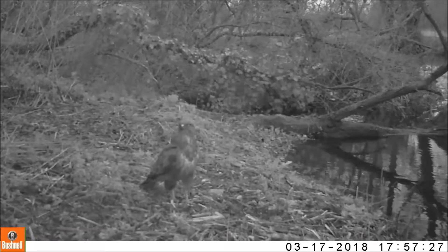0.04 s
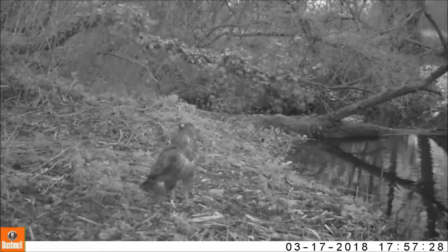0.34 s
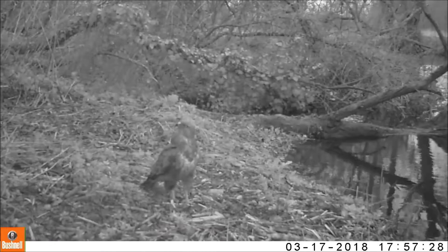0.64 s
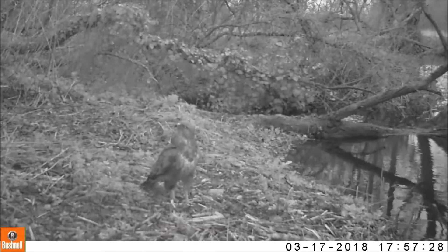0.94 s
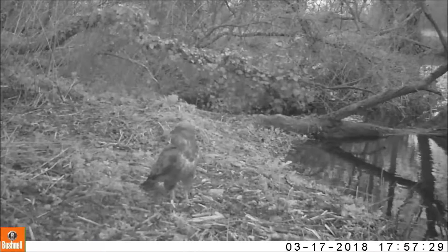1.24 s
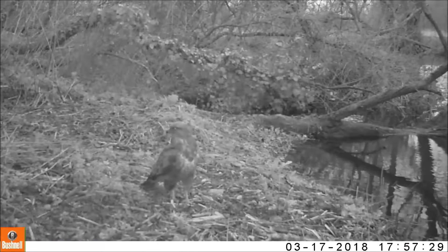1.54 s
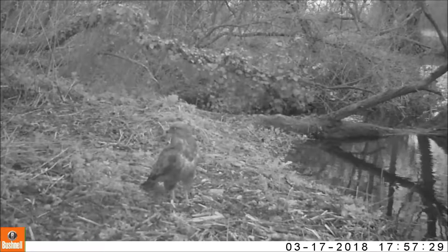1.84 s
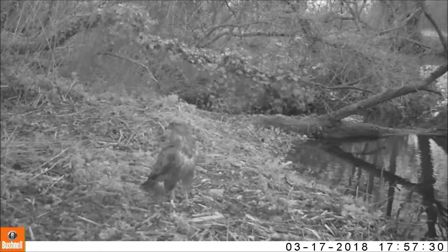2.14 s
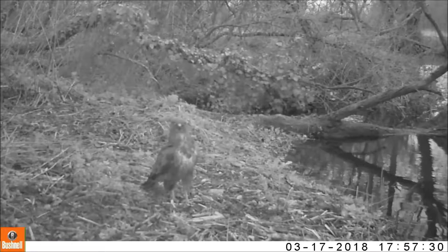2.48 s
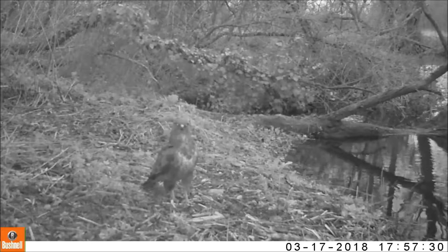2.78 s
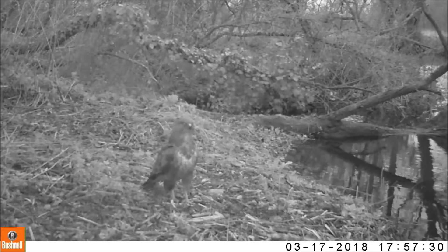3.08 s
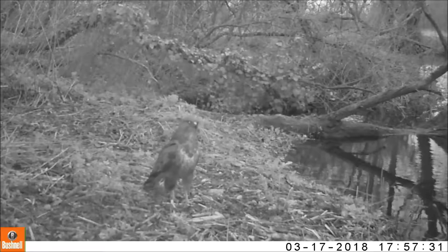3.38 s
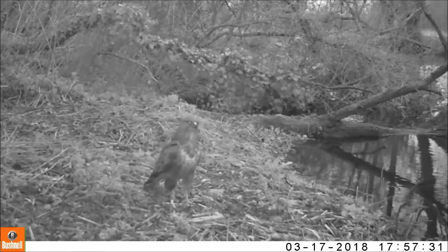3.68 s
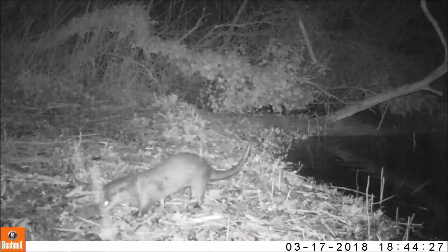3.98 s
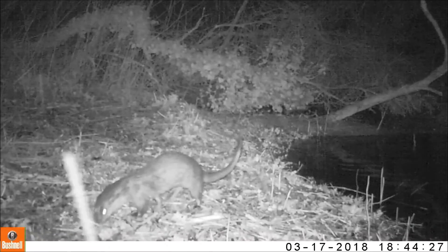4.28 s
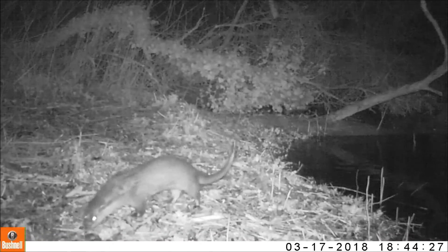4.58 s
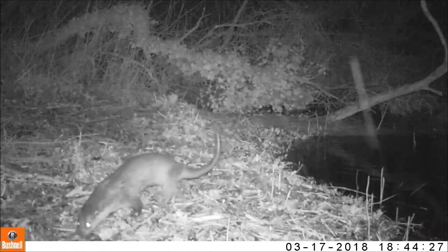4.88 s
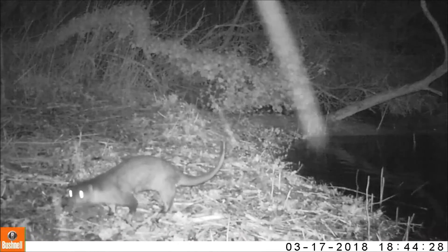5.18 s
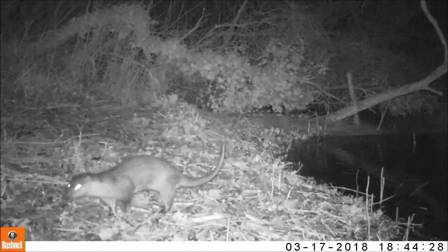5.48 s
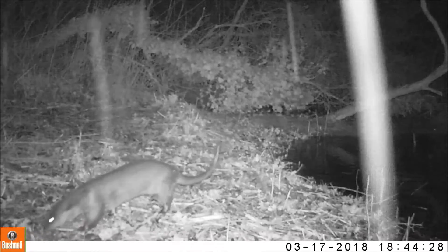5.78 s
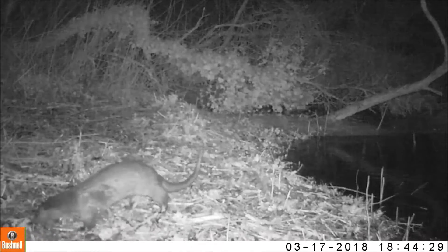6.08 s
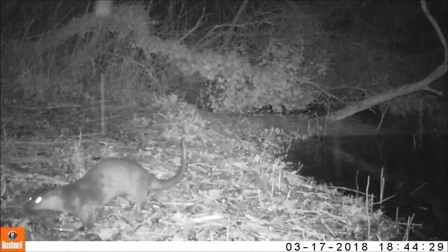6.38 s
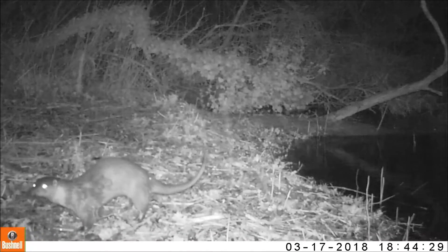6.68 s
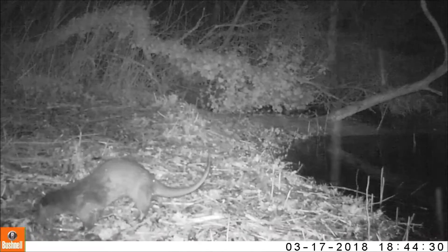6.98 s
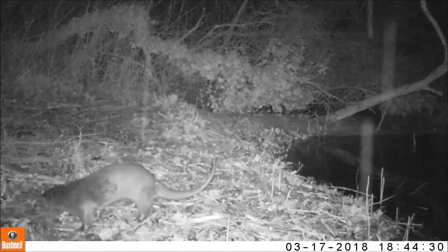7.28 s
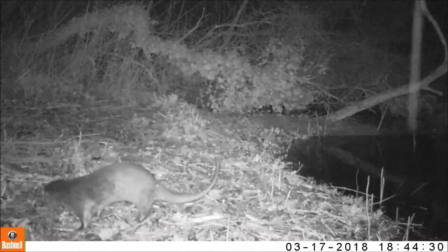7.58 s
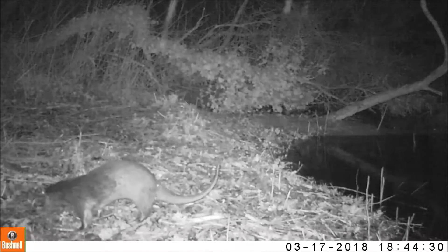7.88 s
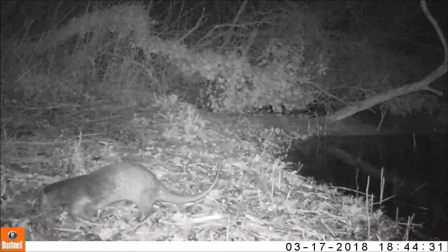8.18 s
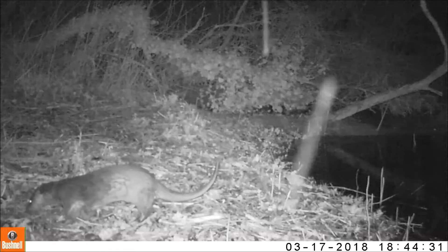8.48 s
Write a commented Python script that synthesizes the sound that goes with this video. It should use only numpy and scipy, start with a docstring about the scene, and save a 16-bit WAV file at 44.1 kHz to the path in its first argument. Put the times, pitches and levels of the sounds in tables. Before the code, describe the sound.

Four short, high whistled chirps from a small bird sound outdoors, with a light breeze on the microphone and steady hiss.

```python
"""Low rumble and even microphone hiss, with a breeze nudging the microphone in soft gusts.
A small bird on a wooded river bank gives four thin, falling whistles: near-pure tones,
scattered by bushes and the far bank. Dry leaves rub faintly.
After the last whistle the sound cuts, with a click, to still air; rumble and hiss go on."""
import sys
import numpy as np
from scipy import signal
from scipy.fft import rfft, irfft, next_fast_len
from scipy.io import wavfile

SR = 44100
rng = np.random.default_rng(int(sys.argv[2]) if len(sys.argv) > 2 else 0)


def digitize_waveform(pressure):
    """Quantize a signal to 16-bit integers and store it at the path in sys.argv[1].

    Rows of a 2-D input are taken as channels; values are limited to [-1, 1].
    """
    field = np.atleast_2d(pressure).T
    bounded = np.clip(field, -1, 1)
    quanta = np.round(bounded * 32767).astype(np.int16)
    wavfile.write(sys.argv[1], SR, quanta)


N = 385434
TIME_S = np.arange(N) / SR
CUT_S = 3.8177

# steady rumble and hiss: (frequency [Hz], relative density [dB])
FLOOR_SPECTRUM = [(14, 5.5), (25, -3.5), (60, -5.5), (120, -10), (250, -14), (500, -19.5), (1000, -27),
                  (1500, -31.5), (2100, -35), (3000, -37.5), (3900, -41), (7500, -45.5), (10500, -45.5),
                  (13500, -46.5)]
# air on the microphone port: (frequency at speed 1 [Hz], relative density [dB])
EDDY_SPECTRUM = [(12, 15.5), (20, 6), (42, -3), (70, -15.5), (110, -22.5), (250, -51)]
# gusts: (centre time [s], length [s], peak level [dB], air speed [ratio])
GUSTS = [(0.115, 0.11, -40.5, 1.53), (0.22, 0.093, -40, 1.24), (0.408, 0.29, -39.5, 1.44),
         (0.567, 0.056, -46.5, 2.8), (1.098, 0.08, -48, 3.1), (1.978, 0.12, -35.5, 0.71),
         (3.105, 0.088, -53, 1.05), (3.637, 0.29, -47.5, 1.0)]
# leaf friction: (frequency [Hz], relative density [dB])
LEAF_SPECTRUM = [(1800, -20), (3000, 6), (4000, 4), (5000, -2), (6700, 6.5), (7800, -12), (12000, -22)]
# leaf stirs: (centre time [s], length [s], peak level [dB])
LEAF_STIRS = [(2.063, 0.018, -73), (2.092, 0.037, -75), (2.762, .014, -72.5), (2.794, .02, -71.5)]
# bird calls: (start [s], length [s], crest pitch [Hz], dip before crest [Hz], sag after crest [Hz],
# start level [dB], fade over call [dB])
WHISTLES = [(0.324, 0.130, 5220, 170, 267, -55, 10), (1.143, 0.112, 5310, 199, 360, -57, 5),
            (1.93, 0.127, 5370, 170, 494, -58.5, 1.5), (3.394, 0.13, 5370, 50, 336, -63.5, -0.5)]


def from_db(db):
    """Decibels to gain."""
    return 10 ** (np.asarray(db) / 20)


def unit_rms(x):
    """Scale to unit power."""
    return x / np.sqrt(np.mean(x ** 2) + 1e-20)


def drift(rate_hz):
    """Smooth random wander, unit RMS."""
    pole = np.exp(-2 * np.pi * rate_hz / SR)
    wander = signal.lfilter([1], [1, -2 * pole, pole * pole], rng.standard_normal(N + SR))
    return unit_rms(wander[SR:])


def coloured_noise(spectrum):
    """Unit-RMS noise of the given spectrum, rolled off beyond both ends."""
    size = next_fast_len(N)
    hz = np.maximum(np.fft.rfftfreq(size, 1 / SR), 1)
    points_hz, points_db = np.transpose(spectrum)
    gain = from_db(np.interp(np.log(hz), np.log(points_hz), points_db))
    gain *= np.minimum(np.minimum(hz / points_hz[0], points_hz[-1] / hz), 1) ** 2
    return unit_rms(irfft(rfft(rng.standard_normal(size)) * gain, size)[:N])


def low_pass(x, edge_hz):
    """Steep FIR low-pass."""
    return signal.fftconvolve(x, signal.firwin(401, edge_hz, fs=SR), mode="same")


def swell(centre_s, length_s, peak_db):
    """Half-cosine rise and fall of gain."""
    return from_db(peak_db) * np.cos(np.pi * np.clip((TIME_S - centre_s) / length_s, -.5, .5))


def background(level_db=-55, lift_before_cut_db=0.28):
    """Distant rumble sloping into the microphone's own hiss."""
    return from_db(level_db + lift_before_cut_db * (TIME_S < CUT_S)) * coloured_noise(FLOOR_SPECTRUM)


def eddies(speed):
    """Air rumbling on the microphone port; faster air shifts the spectrum up."""
    return coloured_noise([(hz * speed, db) for hz, db in EDDY_SPECTRUM])


def breeze(light_air_db=-50.5, swing_db=1):
    """Light air and gusts press on the port until the cut."""
    light_air = from_db(light_air_db + swing_db * drift(rate_hz=6.7)) * eddies(speed=0.87)
    gusts = sum(swell(centre_s, length_s, peak_db) * eddies(speed)
                for centre_s, length_s, peak_db, speed in GUSTS)
    return (light_air + gusts) * (TIME_S < CUT_S)


def cut_click(step_db=-38, settle_s=0.008):
    """A click: the level swells, steps through zero at the cut, then settles."""
    since_s = TIME_S - CUT_S
    return -from_db(step_db) / 2 * np.sign(since_s) * np.exp(-abs(since_s) / settle_s)


def leaves(grain_db=2):
    """Dry leaves rub in short swells of grainy friction."""
    envelope = sum(swell(*stir) for stir in LEAF_STIRS)
    friction = coloured_noise(LEAF_SPECTRUM) * from_db(grain_db * drift(rate_hz=400))
    return envelope * unit_rms(friction)


def woods(x, t60_s, echo_db, first_s, count=160):
    """Trunks and twigs scatter weak echoes that beat against the gliding tone."""
    delays_s = first_s + rng.random(count) * t60_s / 2
    echoes = np.zeros(int(delays_s.max() * SR) + 1)
    echoes[(delays_s * SR).astype(int)] = rng.standard_normal(count) * from_db(-60 * delays_s / t60_s)
    return from_db(echo_db) * signal.fftconvolve(x, echoes / np.linalg.norm(echoes))[:N]


def whistle(call, waver, drop_hz=708, drop_s=0.007, crest_share=0.33, attack_s=0.0088, release_s=0.015):
    """Tone with a faint octave; pitch drops in from above, dips, crests, then sags ever faster."""
    start_s, length_s, crest_hz, dip_hz, sag_hz, level_db, fade_db = call
    since_s = np.clip(TIME_S - start_s, 0, length_s)
    progress = since_s / length_s
    drop = np.exp(-since_s / drop_s)
    dip = np.interp(progress, [0, crest_share], [1, 0])
    sag = np.interp(progress, [crest_share, 1], [0, 1]) ** 1.2
    pitch_hz = crest_hz + drop_hz * drop - dip_hz * dip - sag_hz * sag
    phase = 2 * np.pi * np.cumsum(pitch_hz * (1 + waver)) / SR
    tone = np.sin(phase) + from_db(-21.5) * np.sin(2 * phase)
    gate = np.minimum(np.minimum(since_s / attack_s, (length_s - since_s) / release_s), 1)
    return gate * from_db(level_db - fade_db * progress) * tone


def bird(waver_share=0.0015, flutter_db=1.7):
    """Four whistles, slightly unsteady in pitch and level, with near and far echoes."""
    waver = waver_share * drift(rate_hz=110)
    calls = sum(whistle(call, waver) for call in WHISTLES)
    calls *= from_db(flutter_db * drift(rate_hz=60))
    bushes = woods(calls, t60_s=0.14, echo_db=-16.5, first_s=0.0046)
    far_bank = woods(calls, t60_s=0.32, echo_db=-23, first_s=0.068)
    return calls + bushes + far_bank


def scene():
    """Mono mix at a band-limited microphone; the click reaches higher."""
    outdoors = low_pass(bird() + leaves() + breeze() + background(), edge_hz=13900)
    return (outdoors + cut_click())[None]


def record(dry):
    """Steep roll-off of the top treble."""
    return low_pass(dry[0], edge_hz=16300)[None]


dry = scene()
out = record(dry)
digitize_waveform(out)
```